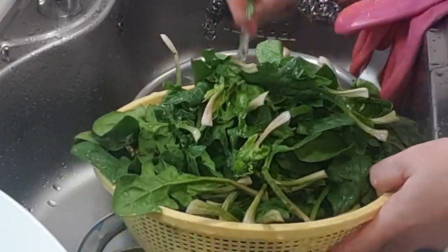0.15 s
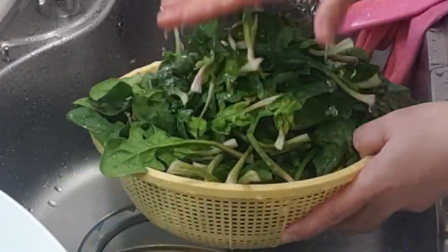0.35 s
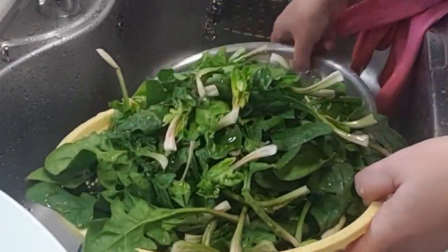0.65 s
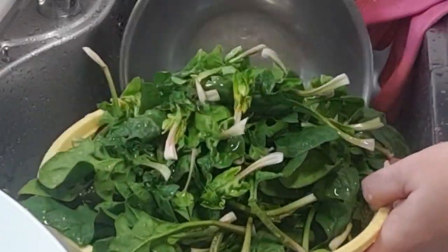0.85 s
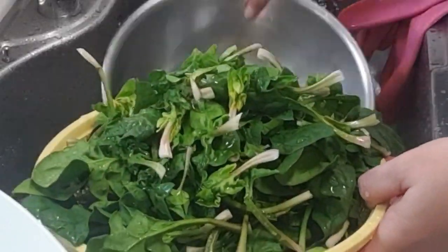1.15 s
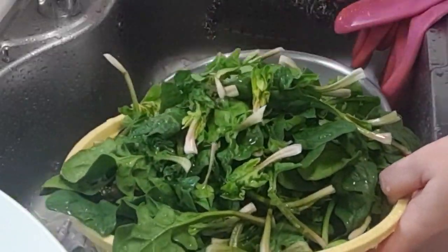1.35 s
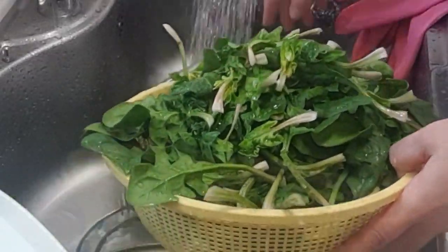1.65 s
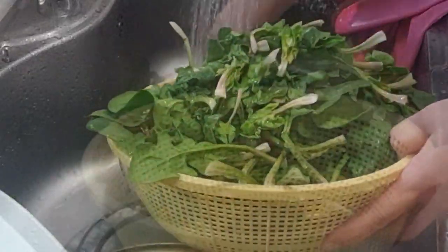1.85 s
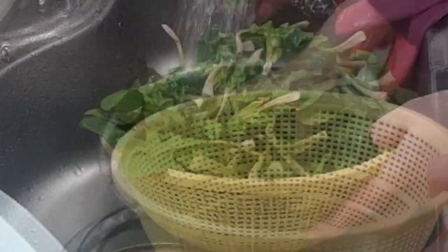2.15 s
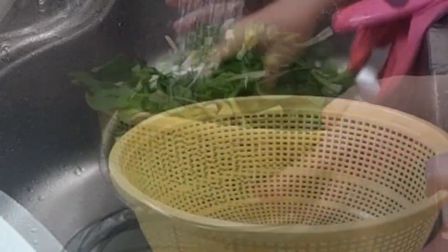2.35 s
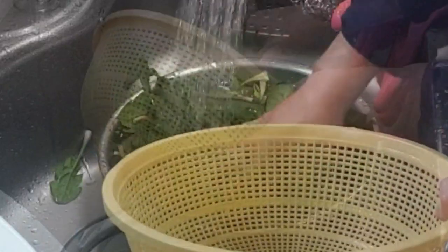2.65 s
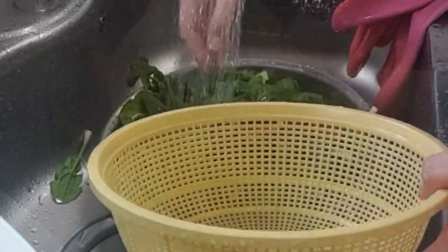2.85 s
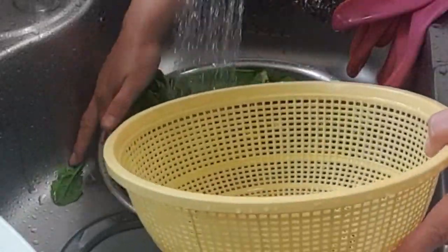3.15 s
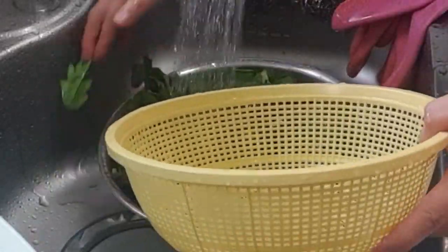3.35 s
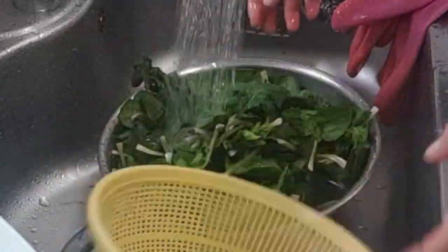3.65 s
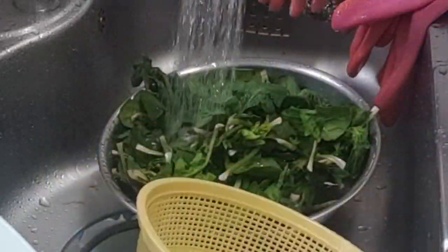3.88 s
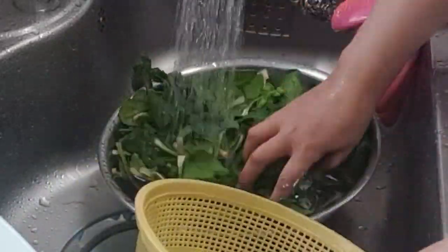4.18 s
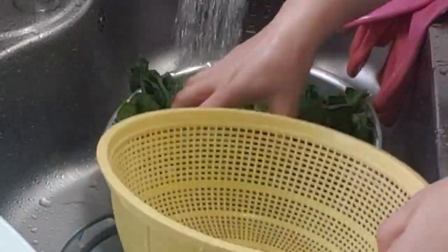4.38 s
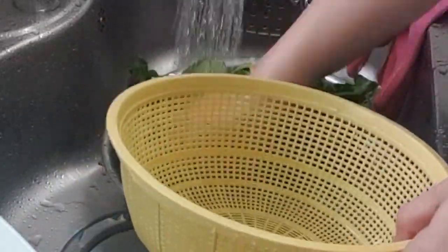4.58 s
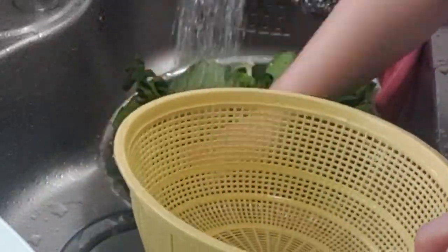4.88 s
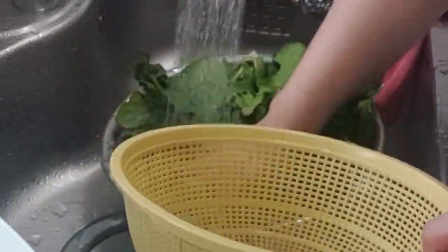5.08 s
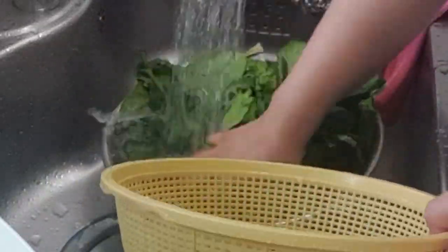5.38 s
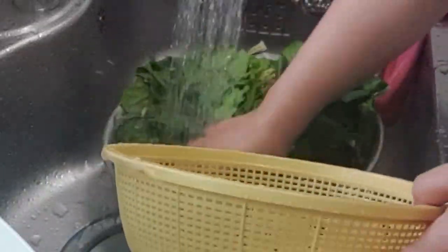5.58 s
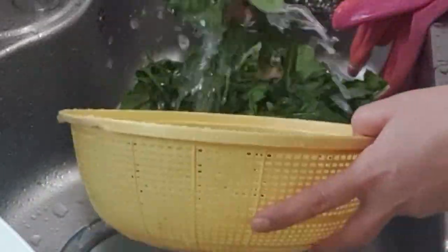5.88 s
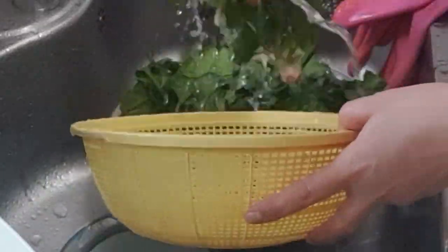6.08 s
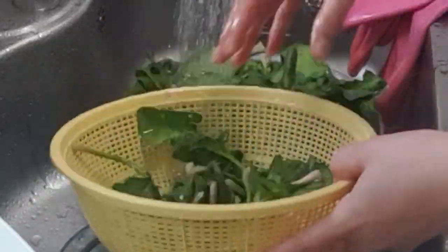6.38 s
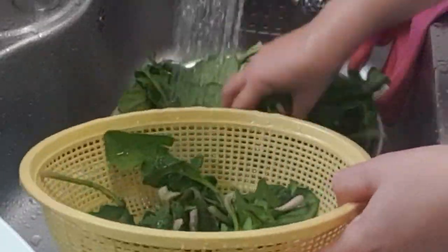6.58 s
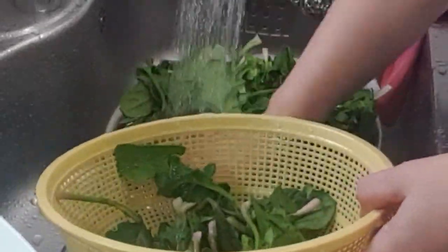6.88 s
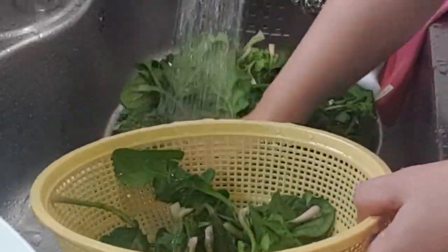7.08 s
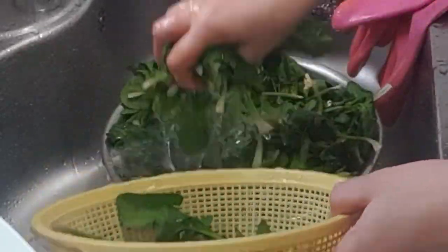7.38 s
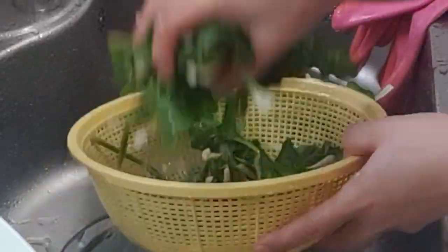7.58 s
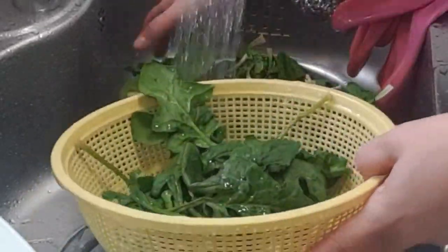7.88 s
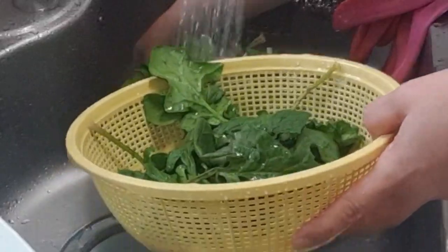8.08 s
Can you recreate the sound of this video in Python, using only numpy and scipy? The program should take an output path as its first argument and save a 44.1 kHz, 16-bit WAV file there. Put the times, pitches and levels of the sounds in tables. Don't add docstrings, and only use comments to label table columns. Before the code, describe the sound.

Close stereo sound of a steel kitchen sink. Sparse drips and small pings come first, then a bowl bumps and tips out water in quick gushes. A tap's bright spray follows, hissing and gurgling on leaves in the bowl. A hollow plastic colander scrapes and knocks the drumming sink floor while hands stir and slap the water.

```python
import sys
import numpy as np
from scipy import signal
from scipy.io import wavfile
from scipy.ndimage import uniform_filter1d

SR = 44100
rng = np.random.default_rng(int(sys.argv[2]) if len(sys.argv) > 2 else 0)


def transcribe(signal):
    frames = np.atleast_2d(signal).T
    limited = np.clip(frames, -1, 1)
    pcm = np.round(limited * 32767).astype(np.int16)
    wavfile.write(sys.argv[1], SR, pcm)


def invert_db(level):
    return 10 ** (np.asarray(level, dtype=float) / 20)


N = 363384

# (time [s], fine spray [dB], beating on the pool [dB])
TIPPING_FLOW = [
    (0.0, -64, -54.5),
    (0.372, -63, -58.5),
    (0.52, -75, -77),
    (0.764, -78, -76),
    (0.908, -49, -39),
    (1.038, -54, -40),
    (1.194, -43.5, -42),
    (1.386, -61.5, -60),
    (1.56, -54, -56),
]
# (time [s], fine spray [dB], beating on the pool [dB])
TAP_FLOW = [(1.58, -43, -48), (1.65, -34, -37.5), (1.8, -38.5, -43.5), (2.05, -36.5, -39.5),
            (2.76, -36, -37.5), (2.82, -39.5, -39.5), (3.1, -44.5, -47.5), (3.66, -44, -47.5),
            (3.85, -43.5, -46.5), (4.16, -45, -51.5), (4.42, -40.5, -45), (4.9, -45.5, -49),
            (5.1, -37.5, -40.5), (5.68, -36.5, -38), (5.94, -41, -50.5), (6.25, -36, -47.5),
            (6.35, -37, -41), (8.24, -36, -40)]
# (time [s], spray change [dB], length [s])
HAND_PASSES = [(1.968, 2, 0.054), (2.42, 2, 0.13), (2.528, -1, 0.31), (3.266, -0.5, 0.22),
               (4.595, -2.5, 0.11), (4.657, 3, 0.2), (4.82, 1, 0.13), (4.966, -1, 0.093), (5.255, 0.5, 0.2),
               (5.59, -1, 0.23), (6.074, 1.5, 0.12), (6.291, -4, 0.046), (6.605, -0.5, 0.17),
               (6.69, 0, 0.071), (6.828, -1.5, 0.087), (6.92, -2, 0.11), (7.277, 1, 0.37),
               (7.48, -1.5, 0.18)]
# (frequency [Hz], density [dB per Hz])
AIR_SPECTRUM = [(530, -30), (900, 21), (1140, -14), (1440, 12), (2520, -42), (6660, -9), (15800, 1)]
# (frequency [Hz], density [dB per Hz])
DRUM_SPECTRUM = [(13, -39), (22, -8), (103, 3.5), (124, 1), (183, -13.5), (260, -24), (340, -57),
                 (570, -120)]
# (frequency [Hz], density [dB per Hz])
SLOSH_SPECTRUM = [(100, -46), (170, 0), (389, 0), (434, 1), (792, -12.5), (877, -2), (994, -22),
                  (1100, -13), (1430, -36), (2420, -120)]
# (frequency [Hz], density [dB per Hz])
SPLASH_SPECTRUM = [(290, -8), (500, -13), (607, -1), (996, -8.5), (1110, -2), (1330, -2.5), (2240, -2.5),
                   (3680, -7), (6570, -12.5), (9000, -16), (11700, -34), (19800, -120)]
# (frequency [Hz], density [dB per Hz])
SPRAY_SPECTRUM = [(1760, -12.5), (3000, -2.5), (3800, -1), (4800, -2.5), (6400, -4), (7600, -4.5),
                  (8900, -0.5), (10500, 0.5), (12300, 1), (14000, -3), (15000, -1), (16000, -13)]
# (frequency [Hz], width [Hz], level [dB], start [s])
BOWL_MODES = [(867, 34, -10, 6.35), (1480, 180, -8.5, 2.45)]
# (frequency [Hz], likeness [0-1])
STEREO_LIKENESS = [(60, 1), (180, 0.96), (550, 0.82), (1650, 0.39), (4970, 0.015), (15000, 0.034)]
# (frequency [Hz], left minus right [dB])
STEREO_LEAN = [(60, -2), (180, -0.5), (550, 2), (1650, 2), (4970, 1), (15000, -2)]
# (time [s], level [dB], share of the floor boom [dB])
SCRAPE_PATH = [
    (2.81, -39, -12),
    (2.869, -33, 6),
    (2.95, -36, -1),
    (3.0, -39, -3),
    (3.078, -32, -10),
    (3.087, -51, -3),
]
# (frequency [Hz], width [Hz], level [dB])
COLANDER_MODES = [(281, 71, 14.5), (410, 200, 6.5), (200, 46, 13), (750, 570, -0.5)]
# (time [s], boom level [dB], boom [Hz], knock against the boom [dB], knock [Hz])
BOWL_HITS = [(0.73, -33.5, 89, -3, 257), (.736, -40.5, 118, 6, 392), (0.768, -22, 132, -10.5, 298),
             (0.838, -29.5, 91.5, -10.5, 200), (0.809, -24.5, 135, -8.5, 460), (0.925, -35.5, 127, 3, 418),
             (0.98, -24, 149, -5, 223), (1.009, -24.5, 129, -2.5, 347), (1.018, -19.5, 135, -13.5, 393),
             (1.3855, -20.5, 94, -12.5, 320), (1.39, -44, 101, 11, 580), (1.444, -49, 101, -18, 172),
             (1.951, -24, 111, -10, 415), (2.047, -33.5, 120, -5, 301)]
# (time [s], boom level [dB], boom [Hz], knock against the boom [dB], knock [Hz])
COLANDER_HITS = [(2.828, -34, 120, -5, 450), (2.852, -33, 171, 1, 290), (2.875, -23, 111, -10.5, 322),
                 (2.9, -27, 110, -3.5, 230), (2.925, -25.5, 126, -9, 242), (2.962, -34, 115, 1, 276),
                 (2.995, -27, 106, -9, 295), (3.015, -21, 118, -10.5, 310), (3.045, -26, 132.2, 2.5, 300),
                 (3.287, -35, 106, -0.5, 423), (3.677, -27, 190, -6.5, 294), (3.688, -31.5, 127, 4, 398),
                 (3.7755, -21, 102, -13.5, 338), (3.833, -27, 108, -13.5, 190),
                 (3.894, -28.5, 107, 4.5, 422), (3.895, -14.5, 120, -17.5, 300),
                 (3.937, -27.5, 101, -14, 395), (4.614, -26, 104, -11, 196), (5.098, -37, 116, -1.5, 490),
                 (6.447, -47, 99, 3.5, 277), (6.478, -46, 100, 1, 270), (6.24, -35, 119, -11, 200),
                 (5.661, -47, 119, 1, 187), (7.69, -44.5, 100, -0.5, 274), (5.153, -40.5, 120, -6, 177),
                 (6.905, -36.5, 107, -2.5, 240), (7.633, -44.5, 99, 1.5, 294), (8.147, -32, 124, -7, 200)]
# (time [s], peak [dB], top [Hz], t60 [s])
CRACK_EVENTS = [(.0253, -42, 2500, .03), (.1002, -50, 5000, 0.022), (.1336, -42, 3500, .02),
                (.2414, -40, 5000, .025), (.2987, -40, 4000, .025), (.354, -40, 6000, .02),
                (.7322, -31, 4000, 0.015), (.738, -23, 1500, 0.018), (.7692, -25, 5000, 0.036),
                (.8116, -23, 5000, .02), (.8854, -28, 3500, .03), (.9185, -33, 3000, 0.017),
                (.9642, -22, 6000, 0.022), (1.016, -25, 5000, .03), (1.1608, -33, 3000, .02),
                (1.2585, -25, 1600, .015), (1.3843, -19.5, 4970, 0.053), (1.5628, -38, 3000, .02),
                (1.5823, -37, 3000, .02), (3.679, -27.5, 1500, 0.038), (3.685, -28, 2500, 0.04),
                (3.7755, -26, 3500, 0.058), (3.8945, -23.5, 3000, 0.037), (3.902, -30, 1200, .05)]
# (time [s], peak [dB])
TICK_EVENTS = [(0.0014, -38), (0.0248, -41), (0.0644, -35), (0.0955, -34), (0.233, -35), (0.313, -27.5),
               (0.3531, -31.5), (0.395, -24.5), (0.4579, -44), (0.5881, -50), (0.9173, -38), (1.0594, -35),
               (1.1194, -44), (1.4726, -38), (.381, -36), (.483, -46), (.494, -48), (.52, -56), (.662, -53),
               (.685, -54), (.9403, -27), (1.99, -31), (2.984, -26), (4.469, -38), (5.373, -23),
               (5.551, -25), (5.925, -27), (6.547, -33), (6.73, -21), (6.8713, -27), (6.878, -26),
               (6.949, -35), (7.499, -34)]
# (time [s], peak [dB], centre [Hz], fizz against the body [dB])
DRIP_EVENTS = [(0.025, -32.5, 1300, -19), (0.0434, -47, 4170, -23), (0.098, -41, 2800, -11),
               (0.119, -40, 1260, -23), (0.1353, -37, 1310, -13), (0.173, -32, 1490, -6.5),
               (0.195, -41, 1770, -23), (0.236, -37, 2730, -10), (0.2995, -35, 1080, -10),
               (0.325, -39, 3580, -18), (0.352, -43, 1410, -14), (0.3726, -47, 3490, -8),
               (0.3974, -54, 2920, 4), (0.4686, -52, 2450, -3), (0.703, -56, 800, -25),
               (0.7105, -44, 864, -21), (.052, -37, 1870, -20), (.255, -49, 1700, -15)]
# (time [s], peak [dB], centre [Hz], fizz against the body [dB])
SLAP_EVENTS = [(2.1276, -41, 1260, 0), (2.1757, -34, 2700, 1), (2.3385, -28, 2850, -9),
               (3.676, -34, 920, -8), (3.775, -27.5, 1900, -7.5), (3.892, -33, 1580, -8),
               (4.6262, -27, 2580, -13), (4.9058, -35, 1820, 0.5), (5.0001, -23, 1920, -18),
               (5.0884, -30.5, 1240, -6), (5.1323, -37, 1490, -12), (6.3262, -23.5, 4130, -7.5),
               (6.8745, -23.5, 1920, -19), (5.427, -25, 2530, -20), (5.628, -27, 1520, -21),
               (5.66, -26, 1420, -11), (3.815, -30, 1530, -9), (3.845, -37, 1490, -3),
               (6.69, -24, 1610, -16), (7.1128, -27, 1140, -20)]
# (time [s], peak [dB], centre [Hz], fizz against the body [dB], t60 [s])
GUSH_EVENTS = [(0.721, -39, 2980, -3, 0.069), (0.7305, -20, 3450, -13, 0.035),
               (0.7657, -28, 1220, -2, 0.036), (0.78, -28.5, 1560, -16, 0.13),
               (0.806, -18, 1040, -15, 0.084), (0.821, -30, 1480, -21, 0.042), (0.872, -24, 1490, -19, .07),
               (0.886, -36, 1135, -24, 0.061), (0.9165, -30.5, 920, -9, 0.049),
               (0.958, -25, 2260, -11, 0.095), (0.985, -12, 1250, -24.5, 0.11),
               (1.0086, -18, 2380, -14, 0.052), (1.0678, -34, 1430, -7, 0.038),
               (1.1016, -37, 1440, -23, 0.091), (1.157, -17, 954, -22, 0.093),
               (1.18, -27, 2500, -20, 0.045), (1.221, -36.5, 1500, -8, 0.07),
               (1.245, -42, 1510, -24, 0.038), (1.294, -35, 4000, -17, 0.04),
               (1.365, -22, 2400, -16, 0.067), (1.384, -24, 1910, -11, 0.078),
               (1.399, -21, 2510, -24, 0.069), (1.459, -30, 4400, -18, 0.066),
               (1.503, -42, 700, -11, 0.049), (1.56, -47, 1000, -6, 0.033), (1.581, -31, 1230, -10, 0.044)]
# (time [s], peak [dB], pitch [Hz], ringing [cycles])
BUBBLE_EVENTS = [(0.031, -38, 1010, 8), (0.118, -36, 1300, 11), (0.24, -28.5, 3200, 10),
                 (0.301, -41, 1110, 27), (0.373, -33, 3360, 17), (1.137, -29, 650, 8),
                 (1.164, -25.5, 848, 22), (1.128, -31, 476, 5.4), (1.146, -27, 810, 7.4),
                 (1.195, -31, 790, 8.1), (1.248, -32, 1900, 8.4), (1.264, -31, 1054, 9.7),
                 (1.279, -34, 910, 10), (1.21, -36, 800, 11), (2.433, -28, 1690, 22), (7.26, -35, 560, 7.3),
                 (7.724, -36, 730, 10), (7.809, -29, 1480, 12), (5.326, -35, 1710, 15),
                 (1.1, -33, 1400, 9.8), (1.178, -36, 2700, 14), (1.178, -17.5, 703, 9),
                 (1.239, -28, 690, 12), (1.2587, -18, 1000, 4), (1.435, -35.5, 1320, 15),
                 (2.362, -28, 870, 17), (4.839, -35, 1400, 14), (5.021, -36, 1660, 17),
                 (5.133, -28.5, 1520, 14), (6.876, -28, 3020, 14), (7.139, -29.5, 1700, 19),
                 (7.188, -31, 1295, 26), (7.29, -26, 1084, 11.6), (7.38, -29, 867, 13),
                 (7.395, -29, 2530, 18), (1.506, -45, 695, 9), (1.561, -38, 1440, 8),
                 (.919, -24.5, 5700, 18), (.961, -25, 5600, 23), (1.013, -27, 5400, 20),
                 (5.983, -34.5, 1980, 12), (6.052, -39, 860, 8), (6.335, -40, 1320, 12),
                 (6.356, -28, 1500, 8.2), (6.478, -36, 850, 12), (6.698, -43, 860, 12),
                 (6.965, -39, 875, 14), (6.995, -34.5, 754, 11), (7.135, -40, 610, 8.9),
                 (7.634, -38, 1130, 12), (5.785, -34, 625, 4.6), (5.63, -40, 670, 8.8)]
# (time [s], peak [dB], pitch [Hz])
PING_EVENTS = [(0.045, -34, 4300), (0.141, -40, 2620), (.175, -41, 4060), (0.181, -42, 1930),
               (.184, -40, 3460), (.25, -41, 3260), (0.304, -35, 1800), (.062, -40, 4050),
               (.258, -38, 2770), (.31, -47, 1520), (.385, -44, 3050), (.068, -40, 8240),
               (0.164, -38, 1520), (.128, -38, 946), (1.09, -31, 1390), (1.201, -37, 1480),
               (1.251, -34, 1840), (1.469, -49, 2000), (1.5, -47, 1420), (4.643, -40, 2760),
               (0.029, -37, 1880), (.1, -40, 2850), (.246, -34, 2710), (.3, -44, 2290),
               (5.219, -26.5, 1640), (6.85, -35, 2260), (7.06, -30, 5700), (8.06, -31, 3880),
               (7.918, -32, 1600)]
# (time [s], length [s], peak [dB], from [Hz], to [Hz], overtone [dB])
LEAF_SQUEAK = (4.6195, .019, -24.5, 2380, 2900, -16)

HAND_ON_POOL = 3.16


def evened(x):
    return x / np.sqrt(np.mean(x ** 2) + 1e-20)


def read(points, hz):
    f, value = np.transpose(points)
    return np.interp(np.log(hz + 1), np.log(f + 1), value)


def add(mix, s, sound):
    part = mix[:, round(s * SR):][:, :sound.shape[1]]
    part += sound[:, :part.shape[1]]


def panned(x, lean_db):
    return x * invert_db(np.array([[.5], [-.5]]) * lean_db)


def resonate(x, hz, width_hz):
    return signal.lfilter(*signal.iirpeak(hz, hz / width_hz, SR), x)


def band(x, low_hz, high_hz):
    sos = signal.butter(2, [low_hz, high_hz], "bandpass", fs=SR, output="sos")
    return evened(signal.sosfilt(sos, x))


def wash(colour, size, patchy_db, flicker_db):
    hop = size // 4
    frames = N // hop + 5
    hz = np.fft.rfftfreq(size, 1 / SR)
    bins = len(hz)
    hz = hz[hz <= colour[-1][0]]
    a, b, c, d, patches = rng.standard_normal((frames, len(hz), 5)).T
    patches = uniform_filter1d(patches, size=5, axis=0)
    patches = evened(uniform_filter1d(patches, size=12, axis=1))
    flicker = evened(uniform_filter1d(rng.standard_normal(frames), size=9))

    same = read(STEREO_LIKENESS, hz)[:, None]
    left = a + 1j * b
    right = same * left + np.sqrt(1 - same ** 2) * (c + 1j * d)
    z = np.array([left, right])
    level_db = read(colour, hz) - 80 * (hz < colour[0][0])
    z *= invert_db(level_db[:, None] + patchy_db * patches + flicker_db * flicker)
    z *= invert_db(np.array([.5, -.5])[:, None, None] * read(STEREO_LEAN, hz)[:, None])
    z = np.pad(z, ((0, 0), (0, bins - len(hz)), (0, 0)))
    return evened(signal.istft(z, nperseg=size, noverlap=size - hop)[1][:, :N])


def bubble(hz, cycles, glide):
    u = np.arange(0, 3, hz / cycles / SR)
    shape = (1 - np.exp(-u / 0.05)) * np.exp(-1.6 * u) * np.cos(u * np.pi / 6)
    return shape / shape.max() * np.sin(2 * np.pi * cycles * (u + glide * u ** 2 / 2))


def grains(colour, low_hz, high_hz, cycles, per_s, spread_db, count):
    landed = 2 * N
    size = invert_db(spread_db * np.minimum(rng.exponential(1, landed), 3.5))
    size = size * (rng.random(landed) < per_s / SR)
    kind, out = rng.integers(0, count, landed), np.zeros(landed)
    for k, hz in enumerate(np.geomspace(low_hz, high_hz, count)):
        grain = bubble(hz, cycles, 0.218)
        grain *= invert_db(read(colour, hz)) * np.sqrt(hz) / np.linalg.norm(grain)
        at = np.flatnonzero((size > 0) & (kind == k))[:, None]
        places = (at + np.arange(len(grain))).ravel()
        out += np.bincount(places, (size[at] * grain).ravel(), landed)[:landed]
    return evened(out.reshape(2, N))


def fizz(noise):
    rim = evened(resonate(noise, 8550, 350))
    return evened(band(noise, 7200, 15500) + .16 * rim)


def flow_db(axis, hand):
    rows, t = np.array(TIPPING_FLOW + TAP_FLOW), np.arange(0, N, 64) / SR
    hands_db = sum(db * np.exp(-(2 * (t - s) / length_s) ** 2) for s, db, length_s in HAND_PASSES)
    level_db = np.interp(t, rows[:, 0], rows[:, axis]) + hand * hands_db
    return np.interp(np.arange(N) / SR, t, level_db)


def shaking():
    out, t = np.zeros((1, N)), np.arange(SR // 2) / SR
    for table, t60_s in ((BOWL_HITS, 1.5), (COLANDER_HITS, 0.21)):
        sway = (1 - np.exp(-t / 0.0018)) * invert_db(-60 * t / t60_s) * np.cos(np.pi * t)
        for s, db, *_ in table:
            add(out, s, invert_db(db) ** 2 * sway[None] ** 2)
    return out[0]


def basin(x):
    t = np.arange(5000) / SR
    taps = rng.choice([-1., 1.], (2, len(t))) * (rng.random((2, len(t))) < .06)
    taps = taps * invert_db(-60 * t / 0.077) * (t > .002)
    return signal.oaconvolve(x, taps / np.linalg.norm(taps[0]), axes=1)[:, :N]


def air():
    return invert_db(-72) * wash(AIR_SPECTRUM, size=1024, patchy_db=.3, flicker_db=.3)


def sink():
    drum_rest_db, drum_share_db, drum_shake_db = -47, -7.5, -14
    slosh_rest_db, slosh_share_db, slosh_shake_db = -59.5, -14, -20.5
    drum = wash(DRUM_SPECTRUM, size=2048, patchy_db=1.2, flicker_db=.6)
    slosh = wash(SLOSH_SPECTRUM, size=1024, patchy_db=2.2, flicker_db=.8)
    beat_db, shake = flow_db(axis=2, hand=HAND_ON_POOL), shaking()
    drum_power = invert_db(drum_share_db + beat_db) ** 2 + invert_db(drum_shake_db) ** 2 * shake
    slosh_power = invert_db(slosh_share_db + beat_db) ** 2 + invert_db(slosh_shake_db) ** 2 * shake
    drummed = np.sqrt(invert_db(drum_rest_db) ** 2 + drum_power) * drum
    return drummed + np.sqrt(invert_db(slosh_rest_db) ** 2 + slosh_power) * slosh


def scrape():
    s, db, boom_db = np.transpose(SCRAPE_PATH)
    t = np.arange(s[0], s[-1], 1 / SR)
    slips = rng.standard_normal(len(t)) * (rng.random(len(t)) < 1500 / SR)
    shell = np.zeros(len(t))
    for hz, width_hz, level_db in COLANDER_MODES:
        mode = resonate(resonate(slips, hz, width_hz), hz, 2 * width_hz)
        shell += invert_db(level_db) * evened(mode)
    floor = evened(resonate(resonate(slips, 103, 63), 106, 63))
    sound = evened(shell) + invert_db(np.interp(t, s, boom_db)) * floor
    sound *= invert_db(np.interp(t, s, db)) * signal.windows.tukey(len(t), .05)
    out = np.zeros((2, N))
    add(out, s[0], panned(sound, -1.2))
    return out


def bumps():
    out, t = np.zeros((2, N)), np.arange(9000) / SR
    ring_cycles = 27.2
    for table, boom_t60_s in ((BOWL_HITS, 0.12), (COLANDER_HITS, 0.093)):
        for s, db, boom_hz, knock_db, knock_hz in table:
            boom = (1 - np.exp(-(t / 0.0048) ** 2)) * invert_db(-60 * (t / boom_t60_s) ** 1.01)
            boom *= np.sin(2 * np.pi * boom_hz * t)
            noise = rng.standard_normal(len(t))
            rattle = evened(resonate(resonate(noise, knock_hz, 200), knock_hz, 200))
            ring = (1 - np.exp(-(t / 0.0029) ** 2)) * invert_db(1.5 - 60 * t * knock_hz / ring_cycles)
            knock = ring * (np.sin(2 * np.pi * knock_hz * t) + 0.74 * rattle)
            add(out, s, panned(invert_db(db + 5.5) * (boom + invert_db(knock_db) * knock), -1.4))
    return out


def cracks():
    out, t = np.zeros((2, N)), np.arange(3000) / SR
    for s, db, top_hz, t60_s in CRACK_EVENTS:
        a, b = rng.standard_normal((2, len(t)))
        noise = band(np.array([a + .6 * b, a - 0.97 * b]), 450, top_hz)
        add(out, s, invert_db(db - 6.5 - 60 * t / t60_s) * (1 - np.exp(-t / 0.00025)) * noise)
    return out


def ticks():
    out, t = np.zeros((2, N)), np.arange(5000) / SR
    for s, db in TICK_EVENTS:
        shape = invert_db(db - 3.0 - 60 * t / 0.033) * (1 - np.exp(-t / 0.0028))
        add(out, s, shape * fizz(rng.standard_normal((2, len(t)))))
    return out


def squeak():
    s, length_s, db, from_hz, to_hz, over_db = LEAF_SQUEAK
    u = np.arange(0, 1, 1 / (length_s * SR))
    phase = 2 * np.pi * np.cumsum(from_hz + (to_hz - from_hz) * u ** 1.6) / SR
    shape = np.sin(np.pi * u ** 1.2) ** .7 * (1 - .45 * np.exp(-((u - .52) / .1) ** 2))
    whistle = np.sin(phase) + invert_db(over_db) * np.sin(2 * phase)
    out = np.zeros((2, N))
    add(out, s, panned(invert_db(db) * shape * whistle, 1.0))
    return out


def plops():
    out = squeak()
    ping_s, waver_depth = 0.0094, .5
    pings = [(s, db, hz, ping_s * hz) for s, db, hz in PING_EVENTS]
    for s, db, hz, cycles in BUBBLE_EVENTS + pings:
        glide = min(110 / hz, .13) * min(12 / cycles, 1) ** 2
        add(out, s, panned(invert_db(db - 3.5) * bubble(hz, cycles, glide), 1.0))
    waver = evened(uniform_filter1d(rng.standard_normal((2, N)), size=110, axis=1))
    return out * (1 + waver_depth * waver) / np.sqrt(1 + waver_depth ** 2)


def gushes():
    out, t = np.zeros((2, N)), np.arange(9000) / SR
    drip_t60_s, slap_t60_s, clump_db = 0.039, 0.063, 3.5
    drips = [(*row, drip_t60_s) for row in DRIP_EVENTS]
    slaps = [(*row, slap_t60_s) for row in SLAP_EVENTS]
    for s, db, hz, fizz_db, t60_s in drips + slaps + GUSH_EVENTS:
        noise = rng.standard_normal((2, 2, len(t)))
        wide = band(noise[0], 1100 - 32 * max(db + 31, 0), 4300 + 90 * max(db + 41, 0))
        cluster = np.zeros((2, len(t)))
        for late, size, side in rng.random((20, 3)):
            one = bubble(hz * 2 ** (2.1 * size - .5), 8, .15)
            add(cluster, late * .5 * t60_s, panned(one, 8 * side - 4))
        bubbly_db = 10.5 - .25 * max(db + 36, 0)
        body = wide + invert_db(bubbly_db) * cluster
        shape = (1 - np.exp(-(t / (0.07 * t60_s)) ** 2)) * invert_db(-60 * (t / t60_s) ** 0.97)
        clumps = evened(uniform_filter1d(noise[1, 0, ::-1], size=90))
        shape = shape * invert_db(clump_db * clumps - 1.24)
        add(out, s, invert_db(db - 11.0) * shape * (body + invert_db(fizz_db + 17.0) * fizz(noise[1])))
    return out


def splash():
    rush = wash(SPLASH_SPECTRUM, size=256, patchy_db=0.5, flicker_db=1.12)
    gurgle = grains(SPLASH_SPECTRUM, 698, 6200, cycles=12.4, per_s=380, spread_db=3.0, count=12)
    blips = grains(SPLASH_SPECTRUM, 809, 5420, cycles=17.4, per_s=110, spread_db=2.5, count=12)
    knocks = rng.standard_normal(N) * (rng.random(N) < 50 / SR)
    beat = knocks + 0.066 * rng.standard_normal((2, N))
    t, ring = np.arange(N) / SR, np.zeros((2, N))
    for hz, width_hz, db, start_s in BOWL_MODES:
        fade_in = np.clip((t - start_s) / 0.11, 0, 1)
        ring += invert_db(db) * evened(resonate(beat, hz, width_hz)) * fade_in
    water = evened(rush + invert_db(-8.5) * gurgle + invert_db(-6) * blips + ring)
    return invert_db(flow_db(axis=2, hand=HAND_ON_POOL)) * water


def spray():
    hiss = wash(SPRAY_SPECTRUM, size=256, patchy_db=1.6, flicker_db=1.7)
    crackle = grains(SPRAY_SPECTRUM, 5000, 15000, cycles=3, per_s=2500, spread_db=4, count=8)
    rim = evened(resonate(rng.standard_normal((2, N)), 8450, 300))
    jets = evened(hiss + invert_db(-9.0) * crackle + invert_db(-13.0) * rim)
    return invert_db(flow_db(axis=1, hand=1)) * jets


def scene():
    blows = bumps() + scrape()
    drops = gushes() + cracks()
    pings = plops()
    bright_echo = invert_db(0.5) * basin(resonate(drops + invert_db(-5.5) * pings, 2800, 11500))
    dull_blows = resonate(resonate(blows, 420, 250), 420, 250)
    echo = bright_echo + invert_db(-10.5) * basin(dull_blows)
    return air() + sink() + blows + drops + pings + ticks() + echo + splash() + spray()


def roll_off(x):
    return signal.sosfilt(signal.butter(12, 15900, fs=SR, output="sos"), x)


def record(dry):
    lowpass = signal.firwin(2047, 15880, window=("kaiser", 9), fs=SR)
    limited = signal.oaconvolve(dry, lowpass[None], "same")
    return roll_off(limited)


dry = scene()
out = record(dry)
transcribe(out)
```